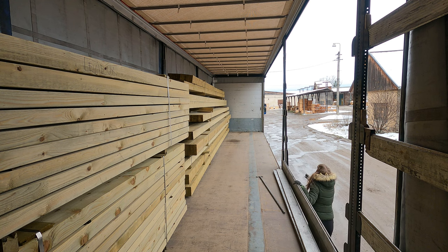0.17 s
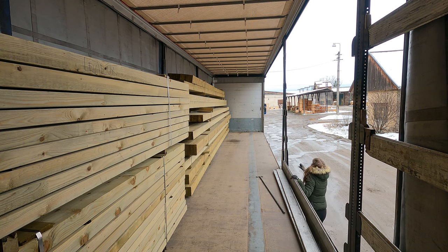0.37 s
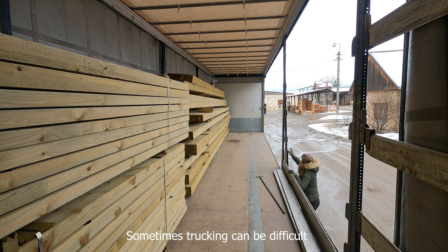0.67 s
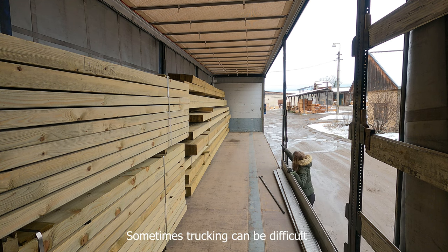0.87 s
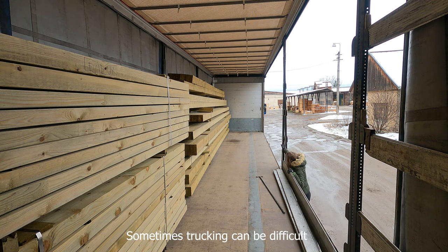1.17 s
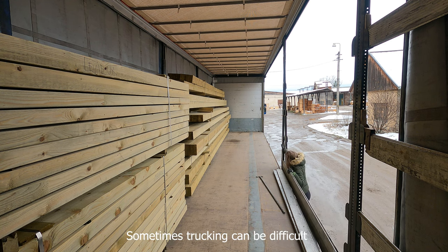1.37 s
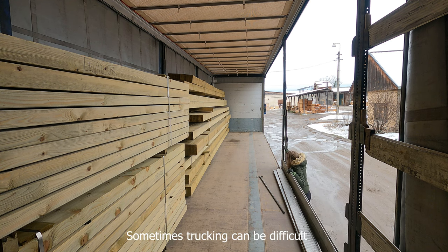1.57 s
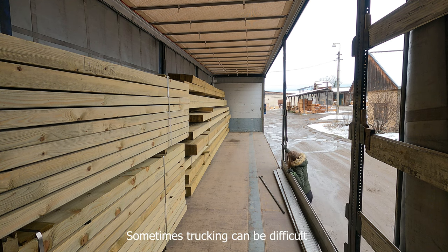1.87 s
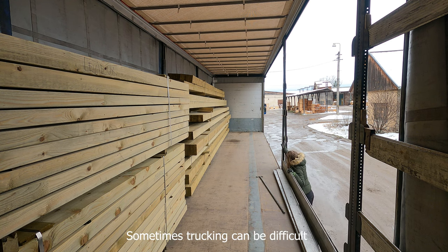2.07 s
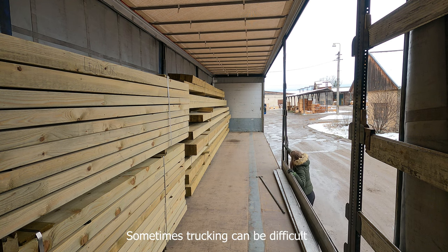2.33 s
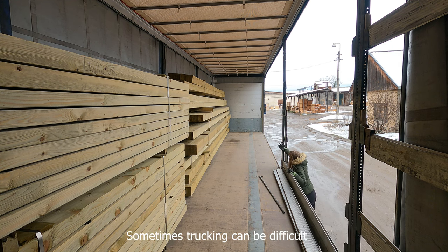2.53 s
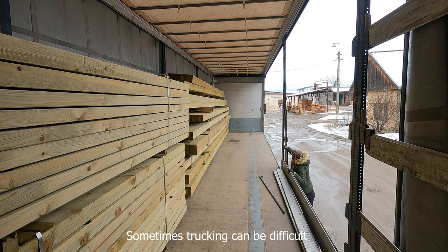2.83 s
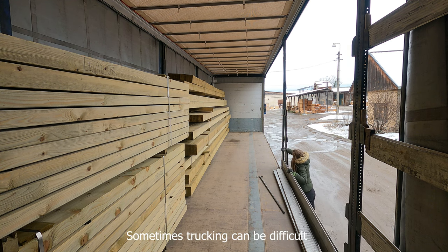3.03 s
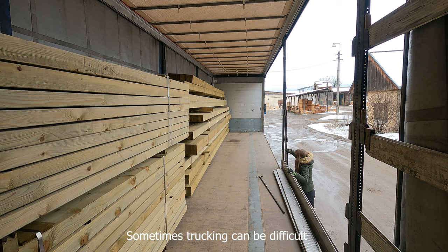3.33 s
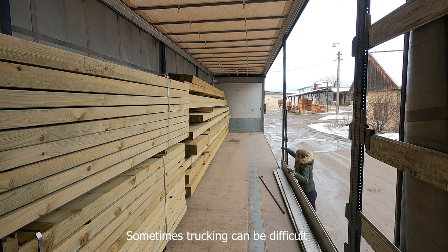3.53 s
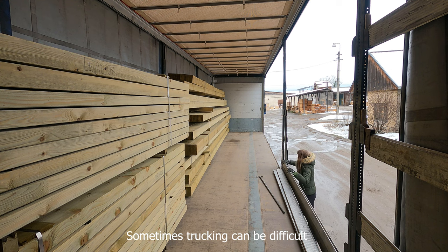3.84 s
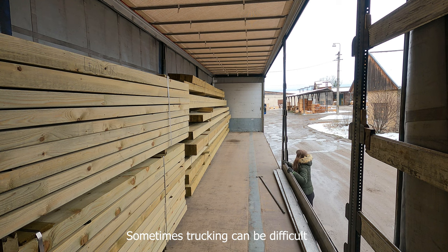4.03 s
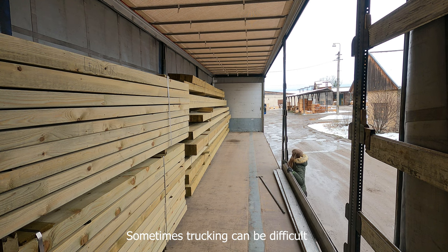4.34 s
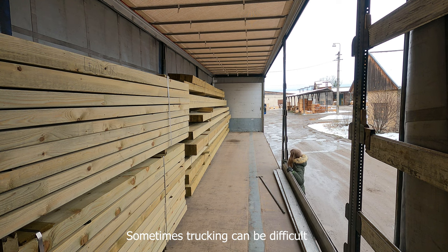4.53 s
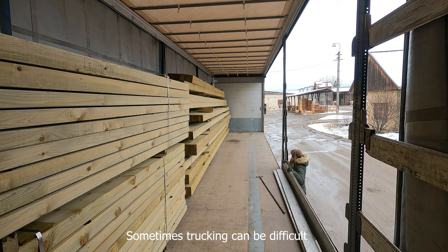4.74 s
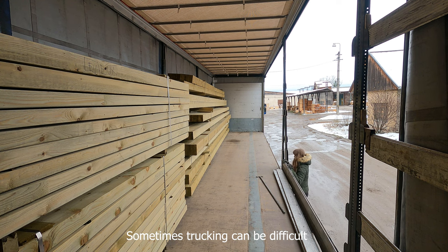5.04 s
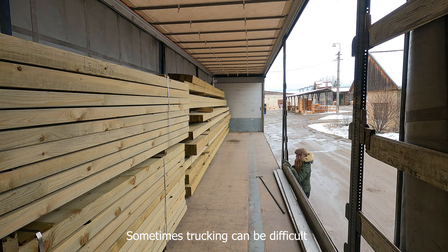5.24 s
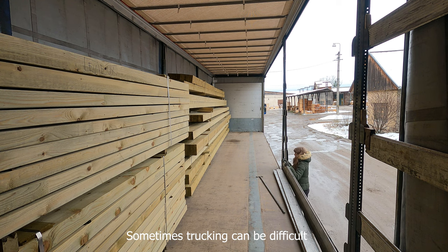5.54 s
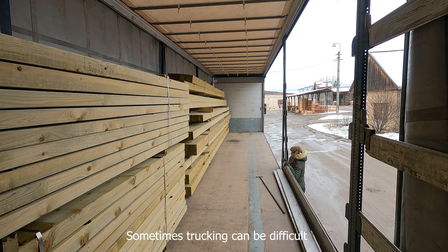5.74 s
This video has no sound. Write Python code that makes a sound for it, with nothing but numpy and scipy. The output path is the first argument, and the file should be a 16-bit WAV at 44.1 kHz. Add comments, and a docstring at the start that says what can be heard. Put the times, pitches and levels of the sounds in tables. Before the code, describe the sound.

Steel post rattled and slammed repeatedly in a roofed trailer, boomy deck thuds and clinks, a final messy flurry, low diesel rumbling outside.

```python
"""Inside an open curtain-sided lorry trailer in a yard, in stereo: someone jerks a jammed steel side post
six times, then works it loose. Each jerk is a quick clatter of contacts: scattered noise bursts with a tail
under the roof, ringing frame modes and booming deck modes. Noise scrapes and clusters of partials clink and thump.
Out in the yard a diesel drones on a sagging and recovering firing tone with harmonics and coloured noise;
a soft hiss with a faint whistle holds for 0.7 s and then fades away."""
import sys
import numpy as np
from scipy import signal
from scipy.fft import rfft, irfft, next_fast_len
from scipy.io import wavfile

SR = 44100
rng = np.random.default_rng(int(sys.argv[2]) if len(sys.argv) > 2 else 0)


def bounce(signal):
    """Save signal as a 16-bit WAV file at the path given by the first command-line argument."""
    frames = np.transpose(np.atleast_2d(signal))
    limited = np.clip(frames, -1, 1)
    pcm = np.round(limited * 32767).astype(np.int16)
    wavfile.write(sys.argv[1], SR, pcm)


N = 260190
TIME = np.arange(N) / SR   # s

# --- yard: engine speed: start_s, firing_rate_hz
SPEED = [(0,38.54),(.4,37.5),(.9,35.37),(1.7,34.32),(2.9,35.1),(3.7,34.03),(4.5,31.45),(4.9,32.65),(5.3,37.13),(5.9,38.95)]
# firing tone, before the overall engine level: start_s, level_db
FIRING = [(0,-32),(.43,-35),(.6,-38),(.8,-36),(1.75,-35.5),(2.8,-39.5),(3.25,-34.5),(3.7,-41.5),(4.9,-35),(5.17,-36),(5.44,-32),(5.9,-35.5)]
# exhaust harmonics, relative to the firing tone: multiple_of_firing_rate, level_db
EXHAUST = [(2,-16),(3,-20.5),(4,-25),(5,-35),(6,-28.5),(7,-26),(8,-34.5),(9,-28.5)]
# second drone of the machine, before its overall level: start_s, pitch_hz, level_db
DRONE = [(0,224.9,-54),(1.3,226.5,-52),(2.5,211.6,-55),(4.1,213.5,-47),(5.2,211,-54.5),(5.9,230.4,-54.5)]
# relative colour of the engine noise: frequency_hz, density_db_per_hz
ENGINE_NOISE = [(50,5),(90,-2),(160,-4.5),(270,-8.5),(380,-12.5),(520,-8.5),(650,-13.5),(930,-12),(1700,-18.5),(2500,-27),(7400,-43.5),(13000,-98)]
# engine noise level at the reference speed, and its rise with speed
REFERENCE_FIRING_HZ, ENGINE_NOISE_DB, ENGINE_NOISE_DB_PER_HZ = 35, -48, 0.72
# relative colour of the hiss: frequency_hz, density_db_per_hz
HISS = [(500,-32),(1200,-2.5),(2400,-1.5),(4000,-2.5),(6500,-4),(9000,-16),(12500,-16),(14500,-40)]
# the hiss holds, then fades to a faint floor
HISS_DB, HISS_HOLD_S, HISS_FADE_DB_PER_S, HISS_FLOOR_DB = -54, 0.73, 45, -73.5
WHISTLE_FADE_DB_PER_S = 10   # on top of the fade of the hiss
# brief swells of the background: middle_s, bell_width_s (standard deviation), low_noise_db, hiss_db
SWELLS = [(5.04,0.081,-52,-59),(5.46,0.085,-42.5,-65)]

# stereo width of all coloured noise: frequency_hz, left_right_correlation
LIKENESS = [(60,.999),(125,1),(250,0.92),(500,0.9),(1000,0.59),(2000,0.6),(4500,0.57),(8000,0.79),(12000,.35)]
# reflection from the timber stack: frequency_hz, left_minus_right_db
STACK_SIDE = [(200,-0.5),(1100,2.5),(4500,0.3),(12000,3)]
CUTOFF_HZ = 13200

# deck and roof panel modes: nominal_pitch_hz, relative_level_db, t60_s
DECK = [(62.4,-1.5,0.72),(87.4,-7,0.67),(105.2,1.5,0.38),(131.6,-9,0.57),(170.6,-8,0.54),(226.7,-10.5,0.32),(277,-18,0.41)]
# the strike jolts the deck, which then drops back
FIRST_JOLT_DB, DROP_AFTER_S, DROP_DB = -1.5, .049, -0.5
# loose buckles and slats chatter after each contact; a tap is 60 dB down after CHATTER_CYCLES
CHATTER_DELAY_S, CHATTER_FADE_DB_PER_S = .05, 103
CHATTER_LOW_HZ, CHATTER_HIGH_HZ, CHATTER_CYCLES = 448, 2636, 61
# side boards and panels knocked by the post: start_s, centre_pitch_hz, relative_level_db, t60_s
THUMPS = [(1.054,1256,-14,0.26),(1.134,957,-9.5,0.44),(1.328,956,-9.5,.13),(1.366,956,-9,.13),
          (1.443,289,-2,0.53),(1.447,565,4.5,0.35),(1.449,1220,-3,.16),
          (1.780,902,11,0.12),(1.783,633,5.5,.25),
          (2.150,1025,-1,.07),(2.165,170,3.5,0.24),(2.174,1405,5.5,0.35),
          (2.611,572,6,.1),(2.612,1084,4,.09),(2.631,988,7.5,0.14),(2.640,435,6.5,0.17),
          (3.128,175.3,9,.3),(3.140,1253,6,0.23),(3.143,900,4.5,0.23),
          (3.541,1307,5,0.18),(3.560,1124,5.5,0.16),
          (4.376,657,9,.09),(4.480,150,-1,0.43),(4.486,250.3,5.5,0.33),(4.487,537,11,0.079),(4.513,620,4,0.058)]
# the catch and loose fittings by themselves: start_s, centre_pitch_hz, relative_level_db, t60_s
CLINKS = [(.283,4600,-6,0.52),(.305,5530,-6,0.3),(1.123,4880,-3.5,0.32),(3.150,12000,-15,0.28),(3.168,5060,6.5,0.43),(3.172,6500,-1,.3),
          (4.461,4220,5,.22),(4.461,4500,-1,0.19),(4.461,5430,1,0.13),(4.461,6050,5.5,0.16),(4.461,11900,-14,0.23),(4.513,7000,1,.09),(4.592,6970,4,0.047)]
# the catch rings as the post slams home, with a faint high overtone
CATCH_T60_S = 0.47
CATCH_OVERTONE_HZ, CATCH_OVERTONE_DB, CATCH_OVERTONE_T60_S = 11900, -16.5, 0.28
BUZZ_PER_S = 250   # random level points in clinks and thumps
# the post scrapes in its socket: peak_s, relative_level_db, rise_db_per_s, release_db_per_s
SCRAPES = [(4.268,0,205,220),(4.457,3.5,450,400),(4.785,-12.5,150,110),(5.49,-16,45,100)]
# relative colour of the scrape: frequency_hz, density_db_per_hz
SCRAPE = [(100,1),(330,-6),(550,2),(1000,-0.5),(2300,-11),(4000,-22),(12000,-49)]
SLIPS_PER_S = 370   # random level points in the scrape

# steel frame modes, before strain and uneven blows: nominal_pitch_hz, relative_level_db
FRAME = [(547,-9),(637,-10),(905,-13.5),(946,-9.5),(1168,-14),(1210,-12),(1257,-13),(1369,-13),(1503,-10.5),(2040,-17),(2287,-11),(2600,-17),(3170,-15),(4149,-17),(4404,-17),(4500,-18),(4886,-20),(4976,-19),(5147,-17),(5486,-17.5),(6400,-21),(7550,-24)]
# decay of those modes, shorter when higher: pitch_hz, t60_s
FRAME_T60 = [(550,0.56),(7500,0.37)]
# relative colour of the clatter: frequency_hz, density_db_per_hz
CLATTER = [(50,-16),(70,-4),(115,-5),(200,-11),(370,-10),(560,-9),(850,-9),(1230,-14),(2670,-15.5),(3790,-22),(5050,-23),(6730,-27),(9000,-40),(10800,-42),(12000,-46),(13500,-49)]
# decay of the tail under the roof: frequency_hz, t60_s
TRAILER = [(80,0.57),(210,0.94),(560,0.5),(1500,0.92),(4000,0.71),(10000,0.25)]
# bands the hollow post hardly radiates: centre_hz, share_taken_out (0-1), quality
HOLLOWS = [(375,0.51,6.8)]
# jerks at the jammed post: start_s, force_db, slack_db, slam_after_s, rebound_after_s, rebound_db,
# struck_spot_hz, added_spot_db, deck_db, deck_tilt_db_per_octave, catch_pitch_hz, catch_db
JERKS = [(1.426,-4.5,-2,.025,0.063,-12,534,4,5,-0.5,4800,-10),
         (1.759,-1,-2.5,.024,0.091,-10.5,860,-21,2,-2.5,4560,4),
         (2.148,-1,-3,0.024,0.091,-10.5,1360,-14,3.5,2,4970,3),
         (2.611,-5.5,-3.5,0.031,0.073,-23,930,-1.5,-2,-0.5,4830,-1),
         (3.108,-1.5,-4,.032,.063,-2,1290,-5,0.5,3.5,5034,-8),
         (3.537,-0.5,-6,0.025,0.071,-2.5,909,-19,1,-6.5,5290,6.5)]
# each contact of a jerk against its force: (clank_db, bright_edge_db)
SLACK, STRIKE, SLAM, REBOUND = (0, -2.5), (-0.27, -0.66), (0, 0), (-1.7, 0)
STRIKE_SHARE = .52   # the strike comes this far on the way to the slam
SLACK_SPOT_HZ, SLAM_SPOT_HZ, KNOCK_SPOT_DB = 925, 1270, 0
# single knocks as the post is gripped and later worked loose: start_s, clank_db, bright_edge_db, struck_spot_hz
KNOCKS = [(0.904,-23,-16,1320),(1.052,-20,-20,1020),(1.123,-14,-10,1398),(1.315,-21,-15.5,959),
          (4.268,-6.5,-10.5,550),(4.325,-4.5,-5,1320),(4.357,-1,-5.5,1590),
          (4.460,-1,0,810),(4.484,-5,-13,540),(4.513,-3.5,-6,1000),(4.586,-6,-14.5,547.6),(4.626,-23,-31,1000),
          (4.725,-24,-16,1210),(4.815,-19,-18,2220),(4.923,-18,-17.5,510),(5.528,-20,-19.5,2703)]


def from_db(db):
    """Decibels to amplitude gain."""
    return 10 ** (np.asarray(db) / 20)


def rms_one(x):
    """Scale to unit rms."""
    return x / np.sqrt(np.mean(x ** 2) + 1e-20)


def in_time(rows):
    """Interpolate each column of a timed table, sample by sample."""
    s, *columns = np.transpose(rows)
    return [np.interp(TIME, s, c) for c in columns]


def at_hz(points, hz):
    """Read a table along log frequency."""
    table_hz, values = np.array(points).T
    return np.interp(np.log(hz), np.log(table_hz), values)


def cut(x, hz, kind, order=2):
    """Butterworth filter."""
    return signal.sosfilt(signal.butter(order, hz, kind, fs=SR, output="sos"), x)


def resonance(x, hz, quality):
    """Band around hz, gain 1 at its centre."""
    return signal.lfilter(*signal.iirpeak(min(hz, .45 * SR), quality, fs=SR), x)


def drift(rate):
    """Random wander through normal points of spread 1, rate points per second."""
    knots = rng.standard_normal(600)
    return np.interp(TIME * rate, np.arange(len(knots)), knots)


def dying(t60):
    """One second of exponential decay."""
    return np.exp(-np.log(1000) * TIME[:SR] / t60)


def add(out, s, sound):
    """Mix a sound in at time s."""
    start = max(int(s * SR), 0)
    out[:, start:start + sound.shape[1]] += sound[:, :N - start]


def stereo_bands(spectrum, size):
    """Third-octave bands of coloured noise; mid and side are weighted for the left-right likeness."""
    edges = 45 * 2 ** (np.arange(26) / 3)
    white = rng.standard_normal((2, 2, size))
    for k, (low, high) in enumerate(zip(edges, edges[1:])):
        mid, side = cut(white[k % 2], [low, high], "band", order=3)
        hz = np.sqrt(low * high)
        alike = np.clip(at_hz(LIKENESS, hz), -1, 1)
        pair = np.sqrt(1 + alike) * mid + np.sqrt(1 - alike) * np.array([side, -side])
        yield hz, from_db(at_hz(spectrum, hz)) * pair


def noise(spectrum):
    """Steady stereo noise of rms 1."""
    return rms_one(sum(band for hz, band in stereo_bands(spectrum, N)))


def modes(table, uneven_db, spread, loose):
    """One blow on a set of modes: strengths vary, loose joints shift pitches, the channels differ in phase."""
    out = np.zeros((2, SR), np.float32)
    for hz, db, t60 in table:
        phase = rng.uniform(0, 2 * np.pi) + spread * rng.standard_normal((2, 1))
        detune = 1 + loose * hz / 1000 * rng.standard_normal()
        turn = 2 * np.pi * hz * detune * TIME[:SR]
        gain = from_db(db + uneven_db * rng.standard_normal())
        out += gain * dying(t60) * np.sin((turn + phase).astype(np.float32))
    return out


def clusters(rows, level_db, width, spread, bite_s, buzz_db, count):
    """Each row sounds close partials that beat under a random level buzz as they die."""
    out, t = np.zeros((2, N)), TIME[:SR // 2]
    for s, hz, db, t60 in rows:
        partials = hz * (1 + width * rng.uniform(-1, 1, size=(count, 1, 1)))
        phase = rng.uniform(0, 2 * np.pi, size=(count, 1, 1))
        phase = phase + spread * rng.standard_normal(size=(count, 2, 1))
        turn = (2 * np.pi * partials * t).astype(np.float32)
        cluster = np.sin(turn + phase.astype(np.float32)).sum(axis=0)
        knots = np.arange(0, 1, 1 / BUZZ_PER_S)
        buzz = np.interp(t, knots, rng.standard_normal(len(knots)))
        envelope = (dying(t60) * (1 - dying(bite_s)))[:len(t)]
        add(out, s, from_db(level_db + db + buzz_db * buzz) * rms_one(cluster) * envelope)
    return out


def firing_rate():
    """Engine speed as firings per second, sample by sample."""
    return in_time(SPEED)[0]


def yard(flutter_db, whistle_hz, whistle_db):
    """Machine noise rising with engine speed, a fading hiss with a faint whistle, and swells of the background."""
    rumble = from_db(ENGINE_NOISE_DB + ENGINE_NOISE_DB_PER_HZ * (firing_rate() - REFERENCE_FIRING_HZ))
    fade_db = HISS_FADE_DB_PER_S * np.maximum(TIME - HISS_HOLD_S, 0)
    hiss = from_db(HISS_DB - fade_db) + from_db(HISS_FLOOR_DB)
    for s, width_s, low_db, high_db in SWELLS:
        swell = np.exp(-.5 * ((TIME - s) / width_s) ** 2)
        rumble = np.hypot(rumble, from_db(low_db) * swell)   # powers add
        hiss = np.hypot(hiss, from_db(high_db) * swell)
    whistle = resonance(rng.standard_normal(N), whistle_hz, quality=27)
    whistle = rms_one(resonance(whistle, whistle_hz, quality=27))
    whistle = from_db(whistle_db - WHISTLE_FADE_DB_PER_S * TIME) * whistle
    flutter = from_db(flutter_db * drift(14))
    return rumble * flutter * noise(ENGINE_NOISE) + hiss * (noise(HISS) + whistle)


def engine(tone_db, throb_db, waver_db, drone_db):
    """A deep firing tone follows the engine speed, with wavering exhaust harmonics and a higher drone."""
    level_db = tone_db + in_time(FIRING)[0] + throb_db * drift(11)
    turn = 2 * np.pi * np.cumsum(firing_rate()) / SR
    tone = np.sin(turn)
    for multiple, db in EXHAUST:
        gain = from_db(db + waver_db * drift(7.7))
        tone = tone + gain * np.sin(round(multiple) * turn + rng.uniform(0, 2 * np.pi))
    hz, db = in_time(DRONE)
    drone_gain = from_db(db + drone_db + waver_db * drift(6.8))
    drone = drone_gain * np.sin(2 * np.pi * np.cumsum(hz) / SR)
    return np.sqrt(2) * (from_db(level_db) * tone + drone)   # sine peak from rms


def deck(level_db, swell_s):
    """Each jerk jolts the deck twice; the broad panels take a moment to start booming."""
    out = np.zeros((2, N))
    for s, _, _, slam_s, *_, db, tilt, _, _ in JERKS:
        panels = [(hz, mode_db + tilt * np.log2(hz / 100), t60) for hz, mode_db, t60 in DECK]
        for after_s, jolt_db in ((0, FIRST_JOLT_DB), (DROP_AFTER_S, DROP_DB)):
            boom = modes(panels, uneven_db=0.0, spread=0.029, loose=0.035)
            boom = boom * (1 - np.exp(-TIME[:SR] / swell_s))
            add(out, s + STRIKE_SHARE * slam_s + after_s, from_db(level_db + db + jolt_db) * boom)
    return out


def contacts():
    """Every touch of steel on steel: start_s, clank_db, bright_edge_db, spot_hz, spot_db, jammed or not."""
    for s, db, slack_db, slam_s, rebound_s, rebound_db, spot_hz, spot_db, *_ in JERKS:
        yield s, *np.add(SLACK, db + slack_db), SLACK_SPOT_HZ, spot_db, True
        yield s + STRIKE_SHARE * slam_s, *np.add(STRIKE, db), spot_hz, spot_db, True
        yield s + slam_s, *np.add(SLAM, db), SLAM_SPOT_HZ, spot_db, True
        yield s + rebound_s, *np.add(REBOUND, db + rebound_db), spot_hz, spot_db, True
    for knock in KNOCKS:
        yield *knock, KNOCK_SPOT_DB, False


def chatter(level_db, uneven_db, spread, count):
    """Each contact shakes loose parts, which tap briefly at random pitches, weaker the later they come."""
    out, t = np.zeros((2, N)), TIME[:SR // 8]
    for s, db, *_ in contacts():
        for after_s in rng.exponential(CHATTER_DELAY_S, count):
            hz = CHATTER_LOW_HZ * (CHATTER_HIGH_HZ / CHATTER_LOW_HZ) ** rng.random()
            tone = np.sin(2 * np.pi * hz * t + spread * rng.standard_normal((2, 1)))
            tap = tone * np.exp(-np.log(1000) * hz * t / CHATTER_CYCLES)
            tap_db = level_db + db - CHATTER_FADE_DB_PER_S * after_s + uneven_db * rng.standard_normal()
            add(out, min(s + after_s, TIME[-1]), from_db(tap_db) * tap)
    return out


def clinks():
    """The catch and its overtone at each slam, then the fittings: start_s, pitch_hz, level_db, t60_s."""
    for s, _, _, slam_s, *_, hz, db in JERKS:
        yield s + slam_s, hz, db, CATCH_T60_S
        yield s + slam_s, CATCH_OVERTONE_HZ, CATCH_OVERTONE_DB, CATCH_OVERTONE_T60_S
    yield from CLINKS


def scrape(level_db, grit_db):
    """Gritty noise of steel in the socket swells ever harder until the post gives way, then drops off."""
    slips = rms_one(sum(band for hz, band in stereo_bands(SCRAPE, 2 * SR)))
    since = TIME[:SR] - .5   # s from the peak
    out = np.zeros((2, N))
    for s, db, rise, release in SCRAPES:
        swell_db = np.minimum(rise * since, -release * since) + grit_db * drift(SLIPS_PER_S)[:SR]
        start = rng.integers(SR)
        add(out, s + since[0], from_db(level_db + db + swell_db) * slips[:, start:start + SR])
    return out


def trailer_response(crack_t60, early_db, early_t60, tail_db):
    """Scattered noise, and a rule that cuts a fresh crack, early echoes and roof tail out of it."""
    centres, bands = zip(*stereo_bands(CLATTER, 3 * SR))
    bands = (np.array(bands) / np.std(sum(bands))).astype(np.float32)
    early = from_db(early_db) * dying(early_t60)
    tails = [from_db(tail_db) * dying(at_hz(TRAILER, hz)) for hz in centres]
    echoes = np.array([early + tail for tail in tails], np.float32)

    def response(crack_db):
        """The airborne sound of one contact."""
        start = rng.integers(2 * SR)
        envelopes = echoes + (from_db(crack_db) * dying(crack_t60)).astype(np.float32)
        return np.einsum("bct,bt->ct", bands[:, :, start:start + SR], envelopes)
    return response


def frame_ring(ring_db, strain):
    """One ring of the steel frame, its modes detuned at random by strain."""
    strained = [(hz * (1 + strain * rng.standard_normal()), db, at_hz(FRAME_T60, hz)) for hz, db in FRAME]
    return from_db(ring_db) * modes(strained, uneven_db=3, spread=.4, loose=.0004)


def post(split_hz, clank_db, edge_db, ring_db, spot_quality, bite_s, dull_hz,
         jammed_crack_db, loose_crack_db, strain):
    """Every contact rings frame and trailer; a separately levelled treble gives steel its bright edge."""
    response = trailer_response(crack_t60=0.025, early_db=-5.0, early_t60=0.41, tail_db=-5.5)
    rings = [frame_ring(ring_db, strain) for _ in range(11)]   # used in turn
    clank, edge = np.zeros((2, 2, N))
    for k, (s, low_db, high_db, spot_hz, spot_db, jammed) in enumerate(contacts()):
        blow = response(jammed_crack_db if jammed else loose_crack_db)
        blow = blow + from_db(spot_db) * resonance(blow, spot_hz, spot_quality)
        blow = blow + rings[k % len(rings)]
        softness = from_db(-.4 * high_db)   # light touches start more slowly and sound duller
        blow = blow * (1 - np.exp(-TIME[:SR] / (bite_s * softness ** 2)))
        add(clank, s, from_db(clank_db + low_db) * blow)
        bright = cut(blow, min(dull_hz / softness, .45 * SR), "low")
        add(edge, s, from_db(edge_db + high_db) * bright)
    out = cut(clank, split_hz, "low", order=3) + cut(edge, split_hz, "high", order=3)
    for hz, share, quality in HOLLOWS:
        out = out - np.clip(share, 0, 1) * resonance(out, hz, quality)
    return out


def off_the_stack(x):
    """Reflection from the timber stack as a left-right balance by frequency, leaning left above the bass."""
    size = next_fast_len(N + SR)
    lean_db = at_hz(STACK_SIDE, np.maximum(np.fft.rfftfreq(size, 1 / SR), 1))
    gains = from_db(np.array([lean_db, -lean_db]) / 2)
    return irfft(rfft(x, size) * gains, size)[:, :N]


def scene():
    """Yard and engine behind, deck underfoot, and the clatter of the post with the timber stack at the left."""
    background = yard(flutter_db=0.6, whistle_hz=2374, whistle_db=-8)
    background = background + engine(tone_db=0.83, throb_db=1.5, waver_db=2.5, drone_db=-4.5)
    boom = deck(level_db=-31.5, swell_s=0.0045)
    clatter = chatter(level_db=-30.5, uneven_db=3, spread=0.19, count=5)
    clatter = clatter + clusters(THUMPS, level_db=-37.5, width=0.0806, spread=0.086,
                                 bite_s=0.015, buzz_db=1.0, count=4)
    clatter = clatter + clusters(clinks(), level_db=-44.5, width=0.055, spread=0.48,
                                 bite_s=0.0082, buzz_db=3.0, count=16)
    clatter = clatter + scrape(level_db=-38.5, grit_db=2.5)
    clatter = clatter + post(split_hz=2400, clank_db=-27.0, edge_db=-26.5, ring_db=-4.0, spot_quality=6.43,
                             bite_s=0.00092, dull_hz=14400, jammed_crack_db=-10, loose_crack_db=-4.5,
                             strain=0.0029)
    return off_the_stack(clatter) + boom + background


def record(dry):
    """A steep elliptic low-pass cuts the top of the treble."""
    return signal.sosfilt(signal.ellip(8, .1, 80, CUTOFF_HZ, fs=SR, output="sos"), dry)


dry = scene()
out = record(dry)
bounce(out)
```